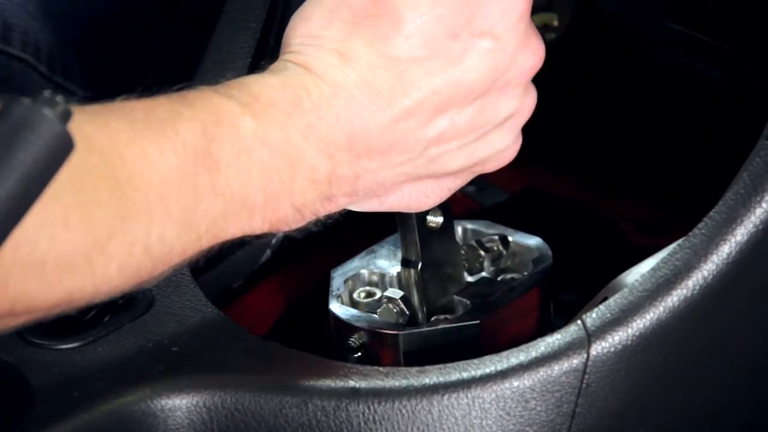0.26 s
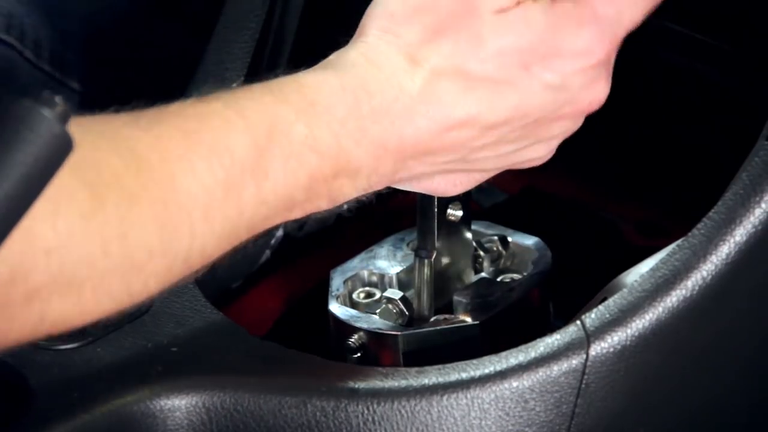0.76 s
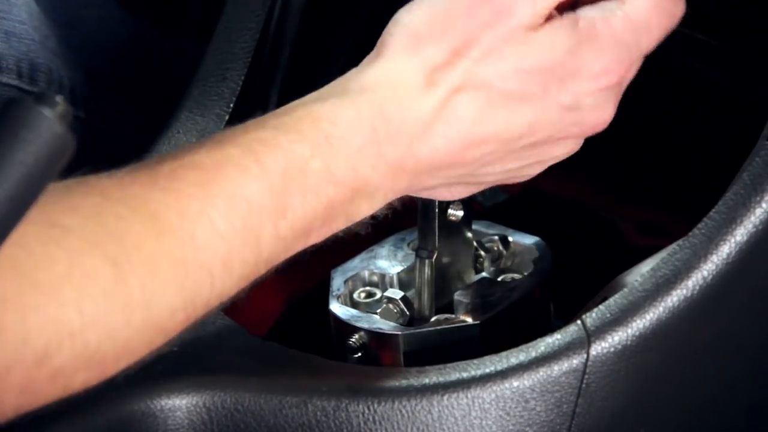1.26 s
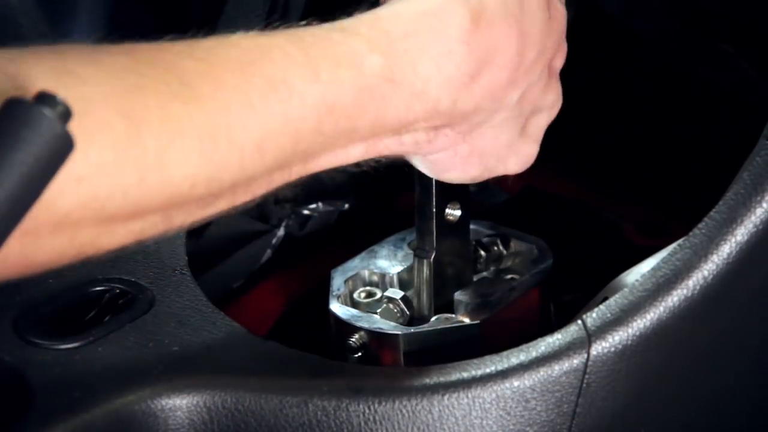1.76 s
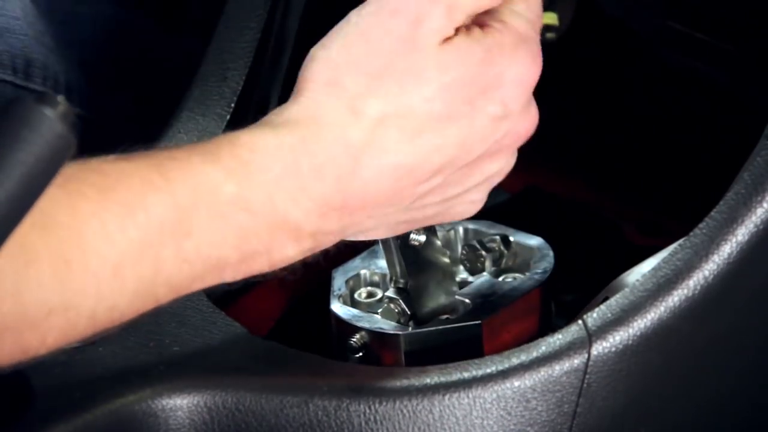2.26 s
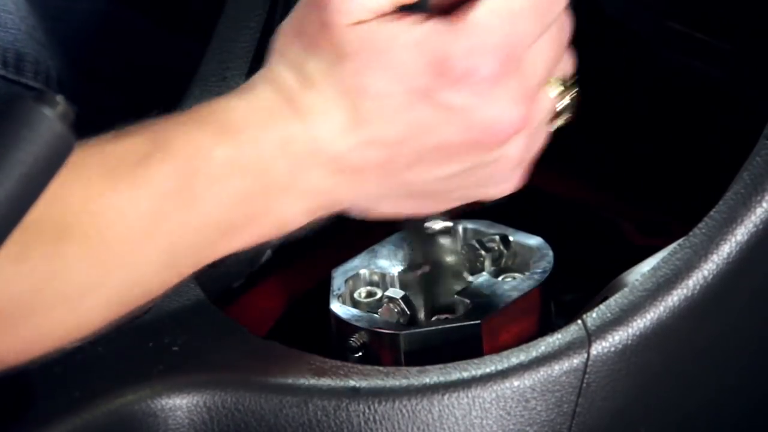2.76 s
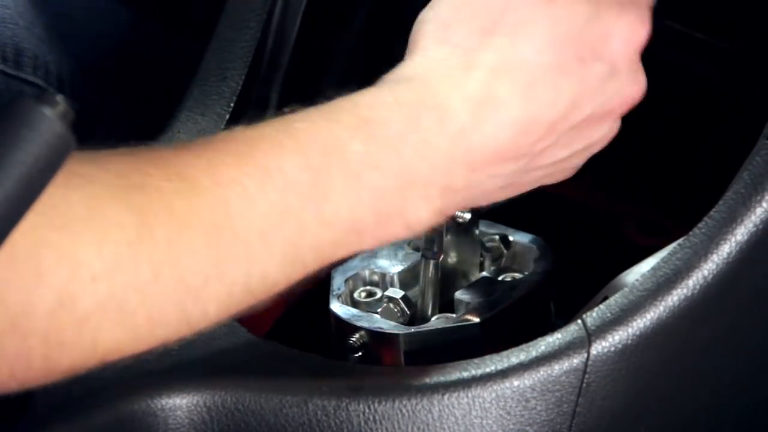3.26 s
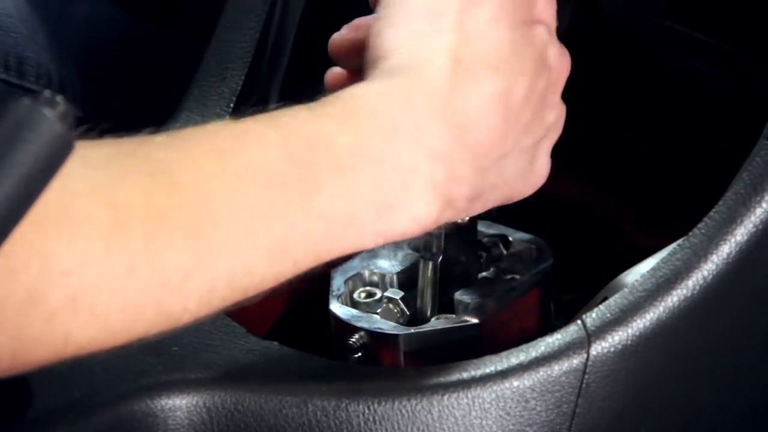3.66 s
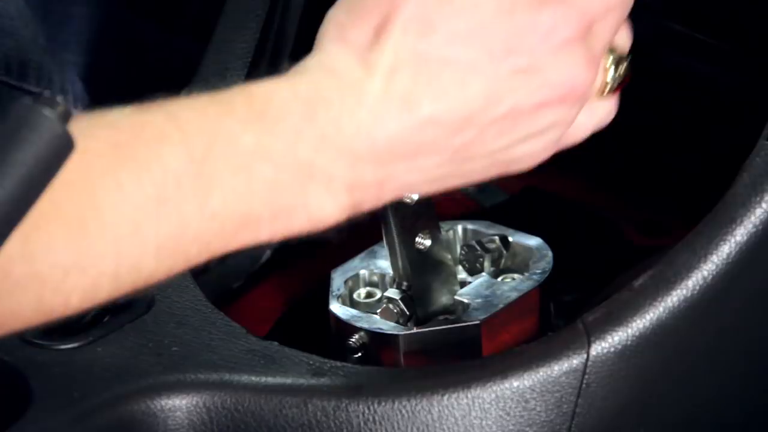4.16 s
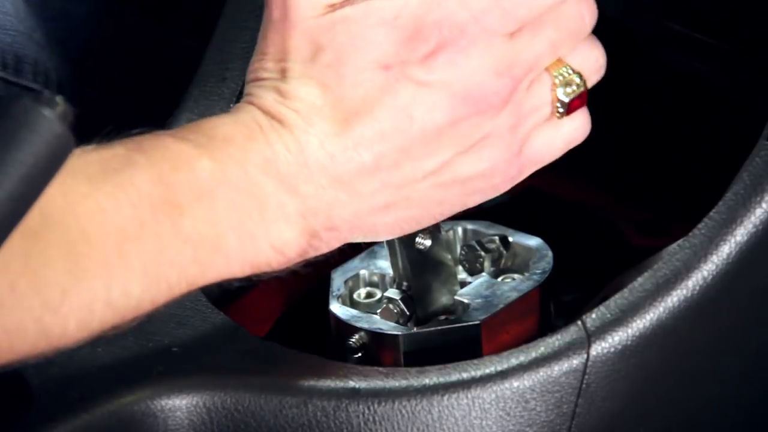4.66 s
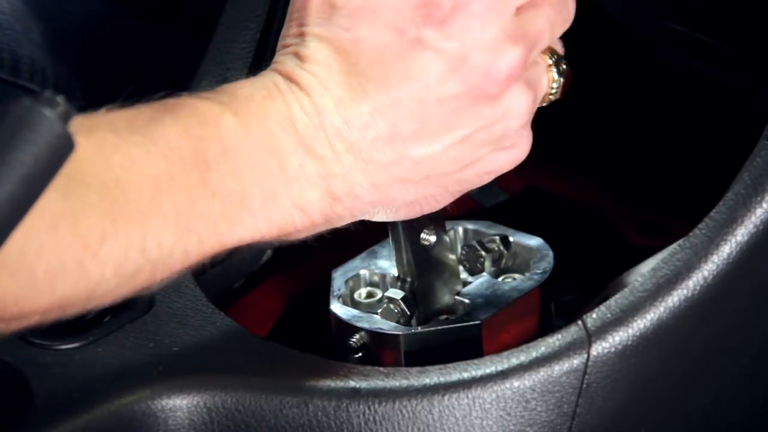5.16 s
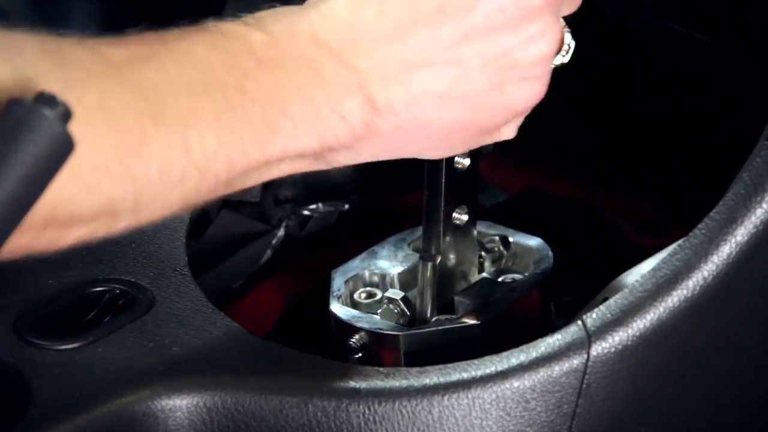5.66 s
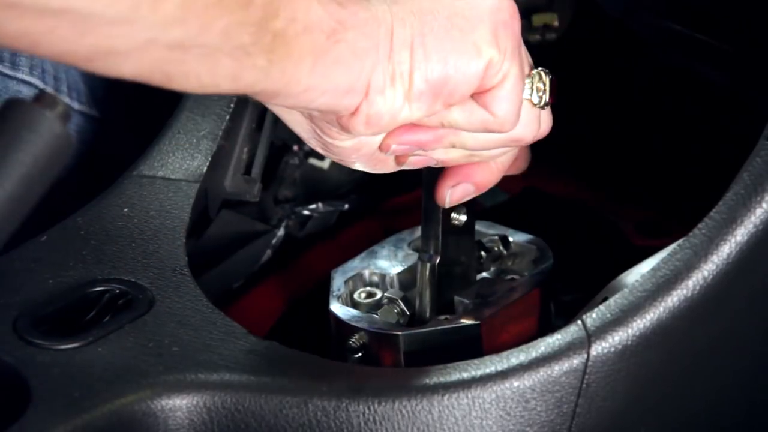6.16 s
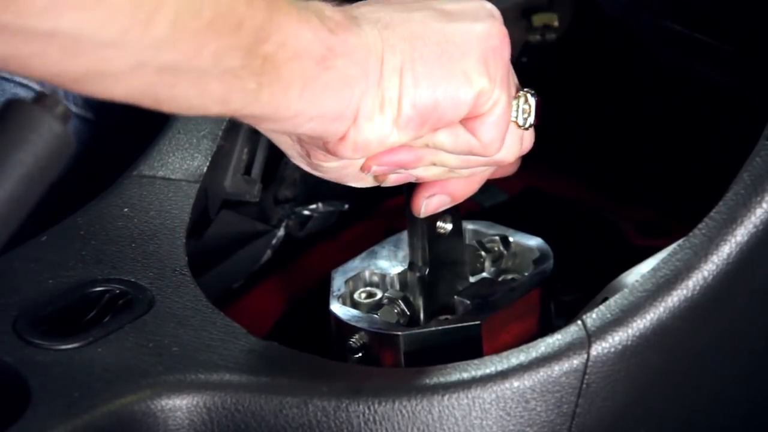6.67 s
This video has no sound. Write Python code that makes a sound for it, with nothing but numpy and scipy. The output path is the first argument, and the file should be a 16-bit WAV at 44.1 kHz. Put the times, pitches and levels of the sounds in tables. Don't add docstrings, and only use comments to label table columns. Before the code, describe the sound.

A steel gear lever is worked through its gates close up, with sharp metallic clacks, clicks and small rattles ringing into a garage.

```python
import sys
import numpy as np
from scipy import signal
from scipy.fft import rfft, irfft, next_fast_len
from scipy.io import wavfile
from scipy.ndimage import uniform_filter1d, map_coordinates

SR = 44100
rng = np.random.default_rng(int(sys.argv[2]) if len(sys.argv) > 2 else 0)


def transcribe(signal):
    frames = np.atleast_2d(signal).T
    limited = np.clip(frames, -1, 1)
    pcm = np.round(limited * 32767).astype(np.int16)
    wavfile.write(sys.argv[1], SR, pcm)


def decibels_to_gain(level_db):
    exponent = np.asarray(level_db, float) / 20
    return 10 ** exponent


N = 304290

# start_s [s], steel_db [dB], housing_db [dB re steel], spring_db [dB re steel], t60_s [s]
BLOWS = [(0.0034, -4.5, -8.5, -21, 0.034), (1.4402, -17.5, 1.5, -11.5, 0.046),
         (1.4556, -7, -1.5, -28, 0.038), (2.3458, -8.5, -5, -13, 0.11), (2.3791, -9, -3.5, -22.5, 0.045),
         (3.3447, -25, -6, -2.5, 0.12), (3.3723, -10, -4.5, -18.5, 0.1), (4.9633, -27.5, 8, -15, 0.023),
         (4.9751, -19, 2, -25, 0.061), (6.3232, -29, 0, -20, 0.08), (6.3449, -21, 0, -28, 0.08),
         (6.7405, -12, 0, -14, 0.13), (6.7595, -12.5, -7, -17, 0.093)]
# start_s [s], steel_db [dB]
TEETH = [
    (6.4743, -28),
    (6.5006, -31),
    (6.5256, -27.5),
    (6.555, -38),
    (6.5774, -27),
]
# centre_hz [Hz], width_hz [Hz], level_db [dB]
LINKAGE = [(446, 307, 1.5), (650, 517, 0), (1070, 565, -6), (1810, 1360, -21.5), (2860, 300, -22)]
# centre_hz [Hz], width_hz [Hz], level_db [dB]
CONSOLE = [(112.4, 43, -1), (234, 67, 2.5), (369, 138, -4.5)]


def unit(x):
    return x / np.sqrt(np.mean(x ** 2) + 1e-20)


def along(points, hz):
    f, v = np.transpose(points)
    return np.interp(np.log(hz + 1), np.log(f + 1), v)


def wobble(rate):
    knots = rng.standard_normal(int(N * 60 / SR))
    return map_coordinates(knots, [np.arange(N) * rate / SR])


def filtered(x, response):
    m = next_fast_len(N + SR // 2)
    h = response(np.fft.rfftfreq(m, 1 / SR))
    gain = h / np.sqrt(np.mean(np.abs(h) ** 2))
    return irfft(rfft(x, m) * gain, m)[:N]


def body(x, modes):
    def response(f):
        total = 0
        for k, (centre, width, db) in enumerate(modes):
            damping = 1j * f * width
            total = total + (-1) ** k * decibels_to_gain(db) * damping / (centre ** 2 - f ** 2 + damping)
        return total
    return filtered(x, response)


def bursts(times, db, t60, rise, edge):
    rattle_db = 2
    force, t = np.zeros(N + SR), np.arange(SR // 4) / SR
    for s, level, life in zip(times, db, t60):
        touch = edge * decibels_to_gain(-60 * t / 0.0036)
        rattle = (1 - np.exp(-t / (rise * life / 0.06))) * decibels_to_gain(-60 * t / life)
        chatter_db = rattle_db * np.repeat(rng.standard_normal(256), 44)[:len(t)]
        burst = decibels_to_gain(level + chatter_db) * (rattle + touch) * rng.standard_normal(len(t))
        force[round(s * SR):][:len(t)] += burst
    return force[:N]


def effort(rows, rise, fall, rest_db):
    t = np.arange(0, N / SR + 0.002, 0.002)
    power = decibels_to_gain(2 * rest_db)
    for s, held, db in rows:
        before, after = (s - t).clip(0), (t - s - held).clip(0)
        power = power + decibels_to_gain(2 * (db - rise * before - fall * after))
    return np.interp(np.arange(N) / SR, t, 10 * np.log10(power))


def microphone_hiss(hiss_db):
    # pitch_hz [Hz], density_db [dB per Hz]
    hiss_colour = [(100, -120), (200, 9), (1000, 6.5), (4000, 3), (8000, 1.5), (13000, 1), (15800, -5)]
    hiss = filtered(rng.standard_normal(N), lambda hz: decibels_to_gain(along(hiss_colour, hz)))
    return decibels_to_gain(hiss_db + 5) * hiss


def cabin_drone():
    # centre_hz [Hz], width_hz [Hz], level_db [dB]
    cabin_air = [(35.8, 17, -14.5), (67.32, 3.76, 5.5), (88.1, 5.1, -7.5), (111, 6.1, -9), (76, 29, -13)]
    # time_s [s], drone_db [dB]
    lean = [(0.0, -36), (0.42, -43), (2.11, -39.5), (2.17, -63), (2.23, -38), (3.8, -43), (4.65, -34),
            (5.01, -36.5), (5.05, -29), (5.67, -38), (5.73, -32), (6.3, -36.5), (6.55, -18), (6.59, -28),
            (6.9, -29.5)]
    drone = body(rng.standard_normal(N), cabin_air)
    drone = drone / np.abs(signal.hilbert(drone)).clip(.1) ** 0.32
    drone_db = np.interp(np.arange(N) / SR, *np.transpose(lean))
    return decibels_to_gain(drone_db) * unit(drone)


def console_friction(hiss_db):
    # start_s [s], held_s [s], creak_db [dB], rub_db [dB]
    pushes = [(0.27, 0.053, -41, -49), (0.431, 0.16, -30, -39), (0.72, 0.1, -44, -48.5),
              (1.2, 0.12, -30.5, -44), (1.35, 0.05, -29, -31.5), (2.12, 0.19, -46.5, -63),
              (3.27, 0.09, -41.5, -55), (4.42, 0.047, -50.5, -67), (4.84, 0.061, -32.5, -54),
              (5.05, 0.34, -47.5, -47.5), (5.39, 0.048, -40.5, -55), (5.66, 0.086, -48, -50),
              (6.06, 0.09, -36.5, -47), (6.22, 0.018, -37, -41.5), (6.41, 0.015, -28.5, -32),
              (6.46, 0.21, -30, -41.5), (6.74, 0.033, -25, -50)]
    # start_s [s], creak_db [dB], rub_db [dB]
    shudders = [
        (0.005, -34, -15),
        (1.462, -31.5, -18.5),
        (2.388, -31, -19.5),
        (3.38, -49, -47),
        (4.978, -30.5, -22),
        (6.77, -48, -50),
    ]
    # pitch_hz [Hz], density_db [dB per Hz]
    rub_colour = [(300, -120), (450, 2), (1000, -5.5), (2500, -14.5), (6000, -30.5), (9000, -120)]
    push_rise, push_fall = 212, 192
    sudden, hold_s = 3000, 0.013

    creak_level = decibels_to_gain(effort([(s, held, c) for s, held, c, r in pushes], push_rise, push_fall, -53))
    creak_level += decibels_to_gain(effort([(s, hold_s, c) for s, c, r in shudders], sudden, 146, -120))
    rub_level = decibels_to_gain(effort([(s, held, r) for s, held, c, r in pushes], push_rise, push_fall, -55))
    rub_level += decibels_to_gain(hiss_db + 2)
    rub_level += decibels_to_gain(effort([(s, hold_s, r) for s, c, r in shudders], sudden, 237, -120))

    slips = wobble(45)
    creak = body(rng.standard_normal(N) * decibels_to_gain(3.0 * slips), CONSOLE)
    lumpy = rng.standard_normal(N) * decibels_to_gain(2.6 * slips + 0.99 * wobble(31))
    rub = filtered(lumpy, lambda hz: decibels_to_gain(along(rub_colour, hz)))
    return creak_level * decibels_to_gain(-1.5) * unit(creak) + rub_level * decibels_to_gain(-7.0) * unit(rub)


def hand():
    # start_s [s], held_s [s], level_db [dB over hiss]
    slides = [(0.44, 0.033, 14), (0.62, 0.27, 7), (0.92, 0.12, 8.5), (1.18, 0.17, 7), (2.85, 0.32, 0.5),
              (3.34, 0.05, 6.5), (4.3, 0.14, 2.5), (4.9, 0.048, 8.5), (5.28, 0.26, 8), (5.7, 0.27, 3),
              (6.2, 0.017, 11), (6.4, 0.026, 9), (6.75, 0.041, 8)]
    hiss_db = -68 + effort(slides, 63, 58, 0)
    return microphone_hiss(hiss_db) + cabin_drone() + console_friction(hiss_db)


def knocks():
    # start_s [s], level_db [dB], t60_s [s]
    ticks = [(0.465, -25, 0.036), (1.128, -32, 0.09), (2.066, -31, 0.097), (2.215, -28, 0.042),
             (2.259, -29.5, 0.038), (2.316, -25, 0.065), (2.335, -22.5, 0.042), (3.37, -7, 0.04),
             (4.468, -32, 0.055), (4.754, -35, 0.049), (4.773, -31, 0.068), (5.058, -23, 0.033),
             (5.256, -28.5, 0.11), (5.438, -30.5, 0.022), (5.812, -27.5, 0.078)]
    # start_s [s], level_db [dB], thud_db [dB re knock]
    thuds = [(0.246, -29, 0), (0.334, -40.5, 9), (0.81, -35.5, -1), (0.997, -35.5, 0), (2.087, -35, 6),
             (2.179, -29.5, -1), (2.191, -25.5, -1.5), (1.845, -37, -10), (2.9, -44, 8), (3.177, -33, -7),
             (3.212, -44.5, 12), (3.295, -37.5, 1), (4.348, -39.5, 2), (4.544, -25.5, 0.5),
             (4.572, -27, -1.5), (4.65, -29.5, -10), (4.665, -30.5, 0.5), (4.682, -27.5, -5),
             (4.806, -26, -4), (5.686, -44, 0), (5.742, -29, 1.5), (5.837, -28.5, -2), (6.013, -37.5, 13),
             (6.165, -35.5, 6), (6.285, -27.5, 8.5), (6.311, -26, -3), (6.411, -19, 0), (6.637, -35, 4),
             (6.666, -27, 9.5), (6.716, -27, 1)]
    tick_thud_db, knock_t60 = -17.5, 0.046
    rows = [(s, db, tick_thud_db, t60) for s, db, t60 in ticks]
    rows += [(*row, knock_t60) for row in thuds]
    rows += [(s, db + 2.5, 6.5, knock_t60) for s, db in TEETH]
    s, db, thud_db, t60 = np.transpose(rows)
    tick = body(bursts(s, db - 8.5, t60, rise=0.0017, edge=1.9), LINKAGE)
    thud = body(bursts(s, db + thud_db, t60, rise=0.0026, edge=0.93), CONSOLE)
    return tick + thud


def contacts(rows, base):
    # centre_hz [Hz], width_hz [Hz], level_db [dB]
    steel_modes = [(1646, 480, 3), (2170, 500, 1.5), (2452, 70, 10), (3020, 620, 2), (3900, 670, 2),
                   (4710, 830, 0.5), (5950, 1500, -5), (8260, 1100, -14)]
    # centre_hz [Hz], width_hz [Hz], level_db [dB]
    spring_modes = [(9170, 1330, 2.5), (10380, 820, 6.5), (12100, 1550, 3.5), (14800, 1600, -2)]
    s, db, base_db, spring_db, t60 = np.transpose(rows)
    steel = body(bursts(s, db - 5.5, t60, rise=0.0016, edge=0.59), steel_modes)
    knock = body(bursts(s, db + base_db - 4.5, 1.55 * t60, rise=0.0027, edge=1.0), base)
    spring = body(bursts(s, db + spring_db + 0.16, 0.81 * t60, rise=0.00073, edge=0.2), spring_modes)
    return steel + knock + spring


def light_contacts():
    # start_s [s], steel_db [dB], base_db [dB re steel], spring_db [dB re steel], t60_s [s]
    clicks = [(0.4833, -32.5, 8, -9, 0.034), (0.5911, -32, 0, -9, 0.023), (0.8373, -26, -5.5, -13, 0.02),
              (1.1683, -44.5, 15, -3.5, 0.046), (1.2307, -30, -10, -17, 0.04),
              (1.2371, -20, 2.5, -15, 0.072), (1.264, -30, 3, -6, 0.044), (1.2864, -46, 1, 1, 0.04),
              (1.328, -26.5, -30, -21, 0.16), (1.3415, -10.5, -19, -11.5, 0.057),
              (1.3578, -13, 1.5, -6, 0.056), (1.4154, -39, -13, -5, 0.023), (1.4205, -28, 7, -7, 0.13),
              (1.599, -35.5, -23, -15.5, 0.074), (1.953, -44, 15, -3, 0.011),
              (1.9987, -51.5, -10, -5, 0.04), (2.48, -68, -10, 8, 0.72), (3.3268, -41.5, 15, -5, 0.11),
              (4.9117, -25, 3.5, -7.5, 0.15), (5.4037, -38, 7.5, -10, 0.033), (6.1, -29.5, 4, -1, 0.18),
              (6.3317, -26, -21, -19, 0.025), (6.6773, -24, 5, -11, 0.029)]
    # start_s [s], steel_db [dB], base_db [dB re steel], t60_s [s]
    edge_taps = [(0.421, -38.5, 13, 0.035), (0.5068, -38, 12, 0.096), (0.537, -28, 7, 0.022),
                 (0.5853, -27.5, 8, 0.031), (1.2146, -36, 12.5, 0.026), (2.2338, -40.5, 10, 0.03),
                 (3.8903, -52, 18, 0.027), (4.0078, -46, 7, 0.023), (4.5273, -50.5, 21, 0.024),
                 (4.559, -42, 15.5, 0.027), (4.8484, -53, 19, 0.053), (4.8853, -44, 21, 0.015),
                 (5.77, -41.5, 13, 0.028), (5.8511, -40.5, 9, 0.019), (6.044, -37.5, 13, 0.06),
                 (6.0753, -37, 8, 0.013), (6.184, -30.5, 6.5, 0.057), (6.3766, -27, 15, 0.032),
                 (6.4346, -28, -4, 0.028), (6.7332, -31.5, 8.5, 0.021)]
    tap_spring_db = -16
    taps = edge_taps + [(s, db, 8.5, 0.029) for s, db in TEETH]
    rows = clicks + [(s, db, base_db, tap_spring_db, t60) for s, db, base_db, t60 in taps]
    return contacts(rows, LINKAGE)


def snaps():
    # start_s [s], peak_db [dB], pitch_hz [Hz], t60_s [s]
    steel_snaps = [(0.0034, -2.5, 1350, 0.0095), (0.0094, -14, 1770, 0.012), (0.5392, -24, 1280, 0.0044),
                   (0.5908, -21.5, 3020, 0.012), (0.8375, -20.5, 1750, 0.0096), (1.3578, -11, 3760, 0.036),
                   (1.4386, -27, 1680, 0.011), (1.4538, -3, 2130, 0.008), (2.3475, -3, 4470, 0.011),
                   (2.3446, -6, 3020, 0.0046), (2.378, 2.5, 970, 0.009), (2.3988, 2.5, 1120, 0.0054),
                   (3.3754, 1, 3930, 0.01), (3.3748, -3.5, 2010, 0.0089), (3.387, -10, 1120, 0.017),
                   (3.8902, -31.5, 1080, 0.027), (4.008, -49, 640, 0.015), (4.9723, -5.5, 1350, 0.013),
                   (5.4024, -43, 1234, 0.0084), (6.347, -8, 1180, 0.0066), (6.4344, -24, 912, 0.0077),
                   (6.473, -37, 1390, 0.013), (6.4996, -33, 1430, 0.0085), (6.5785, -36, 1740, 0.029),
                   (6.6762, -13, 870, 0.011), (6.7406, -6, 3720, 0.0059), (6.76, -1, 950, 0.012)]
    out, t = np.zeros(N + SR), np.arange(SR // 20) / SR
    attack = 1 - np.exp(-t / 0.0001)
    for s, db, hz, t60 in steel_snaps:
        swing = np.sin(2 * np.pi * hz * t) + 0.047 * rng.standard_normal(len(t))
        out[round(s * SR):][:len(t)] += attack * decibels_to_gain(db - 7.5 - 60 * t / t60) * swing
    return out[:N]


def garage():
    # pitch_hz [Hz], t60_s [s]
    decay = [(200, .35), (600, .55), (1300, 1.05), (2500, 1.25), (4500, 1.1), (6500, .8), (9000, .4),
             (15000, .2)]
    # pitch_hz [Hz], level_db [dB]
    colour = [(200, 11), (600, 2), (1500, -0.5), (3300, -3), (3800, -6), (6000, -11), (7000, -16),
              (15000, -13)]
    # centre_hz [Hz], width_hz [Hz], lift_db [dB]
    frame = [(583, 260, 11.5), (1185, 110, 4.5), (1704, 100, 4.5), (2300, 61, 4.5), (3260, 51, 4)]
    # (centre_hz [Hz], width_hz [Hz], lift_db [dB])
    gates = [
        (0, [(1270, 200, 9), (3000, 150, 7), (4900, 500, 6), (6310, 100, 5), (7800, 500, 5)]),
        (1, [(640, 100, 6), (2200, 300, 6), (2900, 200, 3), (5600, 300, 3)]),
        (2, [(2500, 250, 4), (4800, 300, 4), (5430, 150, 4), (8500, 800, 4)]),
        (3.0, [(560, 150, 4), (2650, 300, 3), (4430, 180, 8), (5700, 200, 5)]),
        (4, [(670, 100, 5), (2140, 200, 3)]),
        (6, [(1430, 100, 4), (2000, 200, 4), (5700, 150, 4), (10200, 500, 5)]),
    ]
    out, fine = np.zeros(N + 2 * SR), np.fft.rfftfreq(2 * SR, 1 / SR)
    for s, db, _, spring_db, _ in BLOWS:
        hz, t, z = signal.stft(rng.standard_normal(SR), SR, nperseg=256)
        swell = 1 - np.exp(-t / 0.002)
        fall_db = along(colour, hz)[:, None] - 60 * t / along(decay, hz)[:, None]
        z = z * swell * decibels_to_gain(fall_db) * (hz[:, None] > 150)
        tail = signal.istft(z, SR, nperseg=256)[1][:SR]

        ring = frame + [modes for start, modes in gates if start < s][-1]
        lift_db = sum(lift / (1 + (2 * (fine - c) / w) ** 2) for c, w, lift in ring)
        lift_db += 2 * unit(uniform_filter1d(rng.standard_normal(len(fine)), size=80))
        wet_db = -10 + 0.66 * (db + spring_db)
        out[round(s * SR):][:SR] += decibels_to_gain(wet_db) * irfft(rfft(tail, 2 * SR) * decibels_to_gain(lift_db))[:SR]
    return out[:N]


def bell():
    # pitch_hz [Hz], level_db [dB], t60_s [s]
    housing_tones = [(575, -7, .2), (608, 0, .28), (655, -4, .22), (1200, -14, .25)]
    out, t = np.zeros(N + SR), np.arange(SR // 2) / SR
    attack = 1 - np.exp(-t / 0.00097)
    for s, db, base_db, *_ in BLOWS:
        tones = np.zeros(len(t))
        for hz, level, t60 in housing_tones:
            tones += decibels_to_gain(level + rng.normal(0, 2) - 60 * t / t60) * np.sin(2 * np.pi * hz * t)
        out[round(s * SR):][:len(t)] += decibels_to_gain(db + base_db - 11.5) * attack * tones
    return out[:N]


def gear_blows():
    # centre_hz [Hz], width_hz [Hz], level_db [dB]
    housing = [(358, 38, -2.5), (581, 83, -6), (652, 130, -12), (816, 49, -2.5), (1192, 56, -10.5),
               (1350, 42, -5)]
    return contacts(BLOWS, housing) + bell() + garage()


def scene():
    mix = hand() + knocks() + light_contacts() + snaps() + gear_blows()
    return mix[None]


def top_cut(x):
    return signal.sosfilt(signal.butter(12, 16960, fs=SR, output="sos"), x)


def record(dry):
    top_hz = 15850
    m = next_fast_len(N + 4096)
    passed = np.fft.rfftfreq(m, 1 / SR) < top_hz
    kept = irfft(rfft(dry, m) * passed, m)[:, :N]
    return top_cut(kept)


dry = scene()
out = record(dry)
transcribe(out)
```